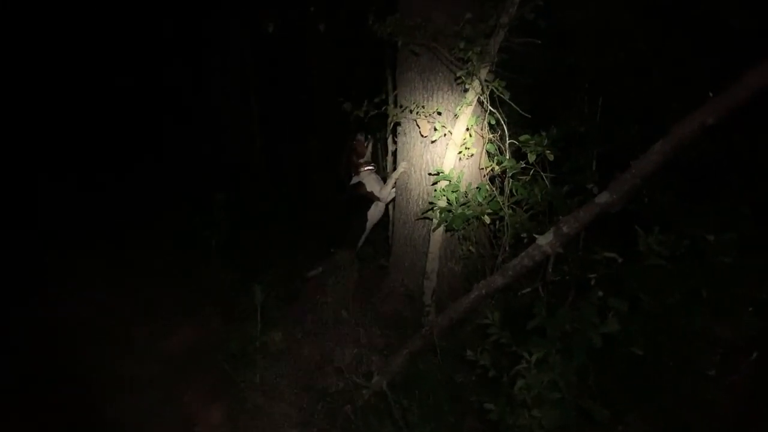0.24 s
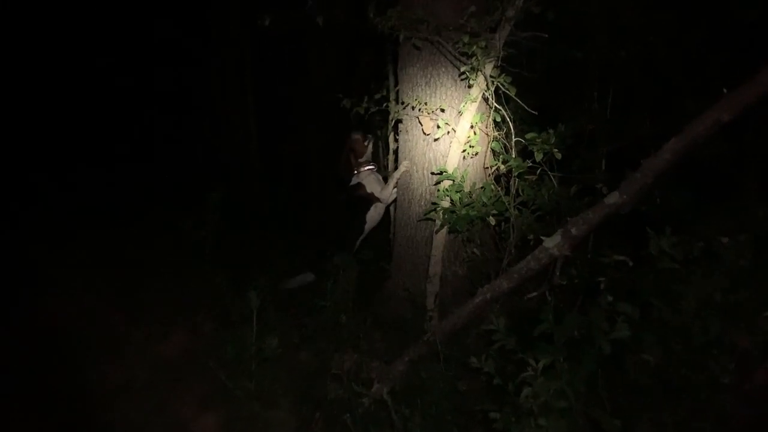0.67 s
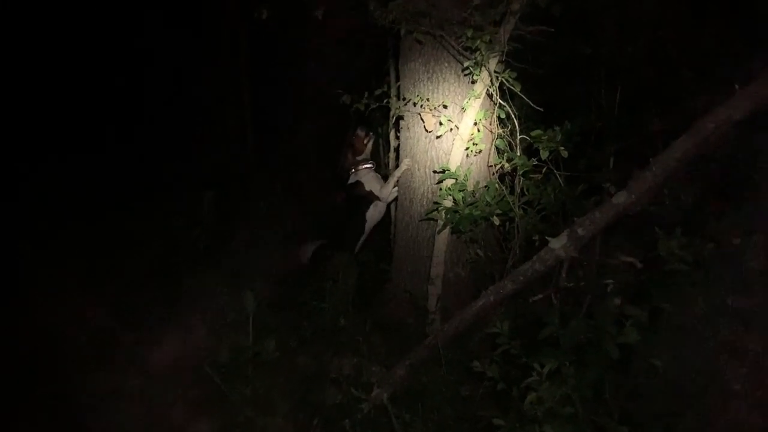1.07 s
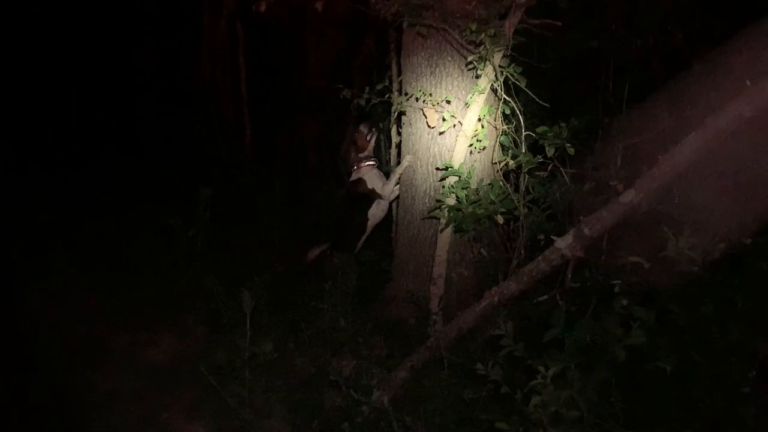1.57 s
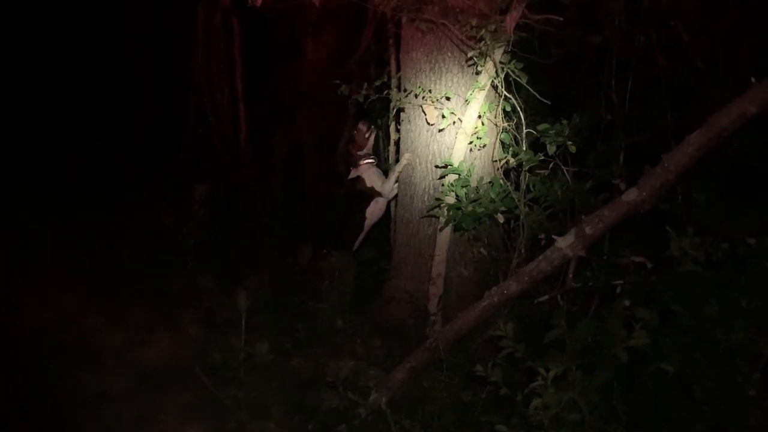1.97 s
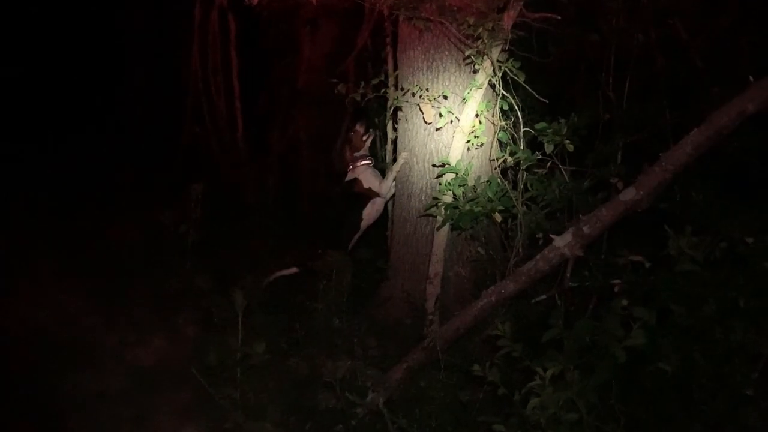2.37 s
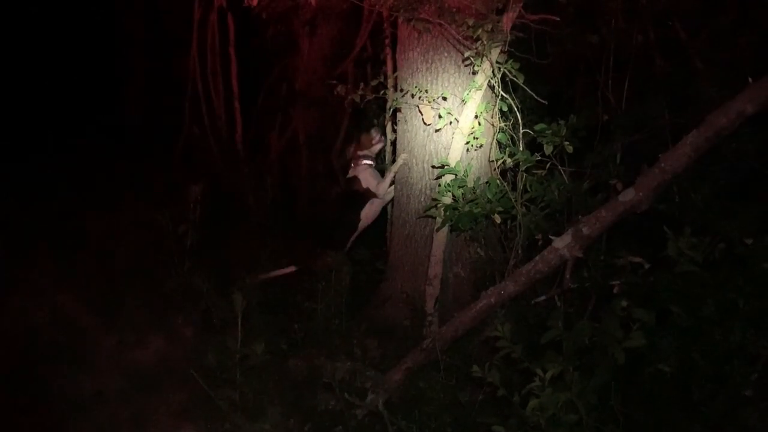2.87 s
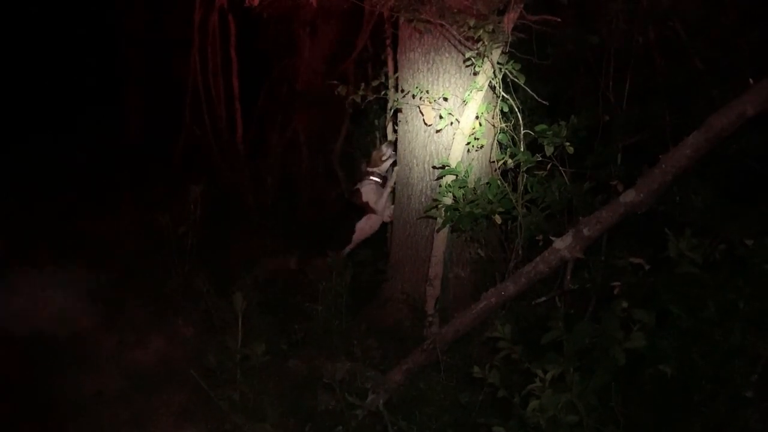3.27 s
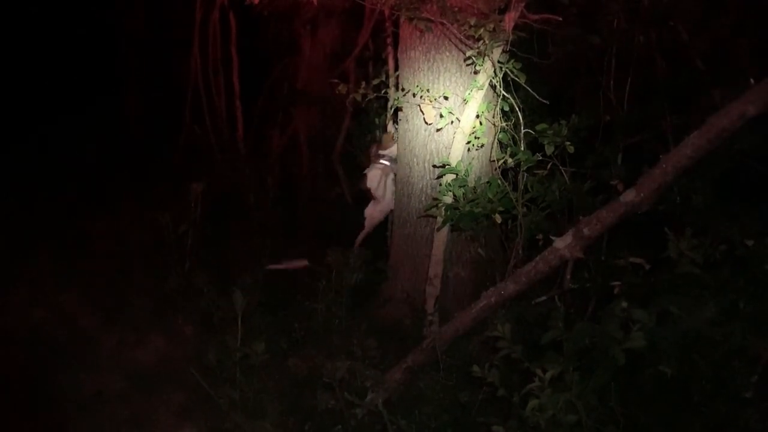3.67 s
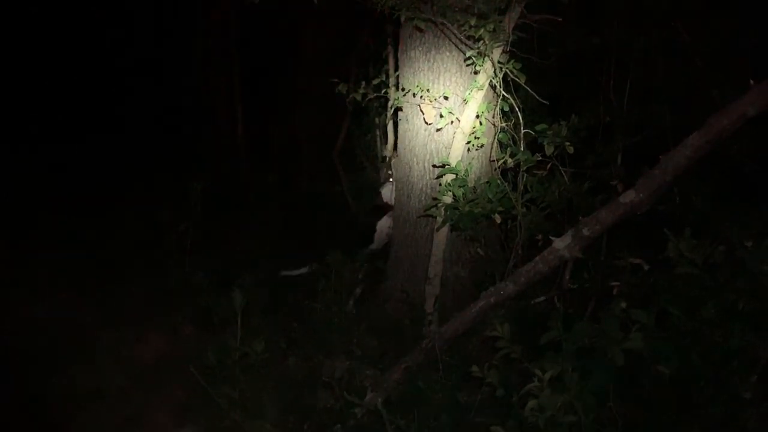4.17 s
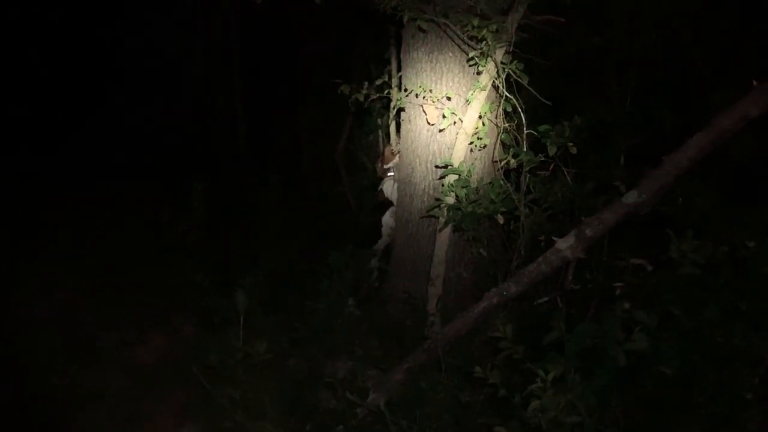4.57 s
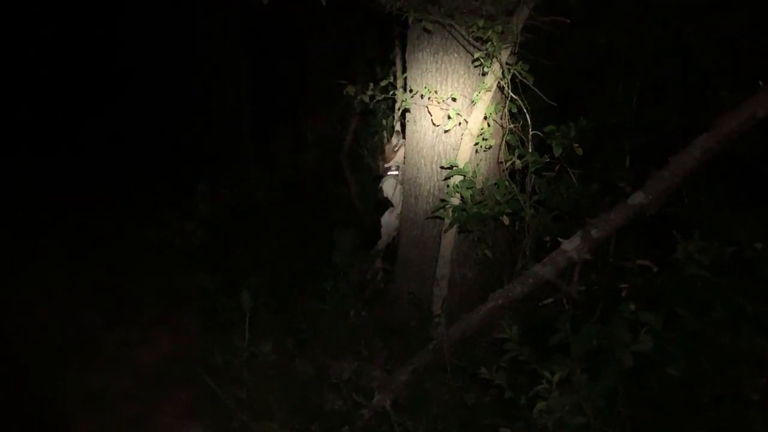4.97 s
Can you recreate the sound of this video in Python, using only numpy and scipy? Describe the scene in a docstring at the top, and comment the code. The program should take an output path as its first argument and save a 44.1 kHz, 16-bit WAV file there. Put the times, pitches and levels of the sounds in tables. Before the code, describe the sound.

At night in the woods, a hound at a tree trunk barks eight times, loud and close. Each bark starts as a thin yelp, bursts into a clear note and goes hoarse. Trees return a diffuse fading echo. Between barks come tiny puffs, a faint steady engine idle, soft hiss and distant insect trills. Stereo microphones stay fixed.

```python
"""Hound barking in the night woods

A hound barks eight times. Each bark opens with a thin high yelp made of a few harmonics, breaks into
a loud clear note, and turns hoarse as a second part of the vocal folds swings at a pitch of its own.
A ninth yelp is just starting at the end. The trees throw the barks back as a scattered, fading echo.
An engine idles faintly as a sum of steady tones; shaped noise makes the soft hiss, puffs and insects."""
import sys
import numpy as np
from scipy import signal
from scipy.fft import rfft, irfft, next_fast_len
from scipy.io import wavfile
from scipy.ndimage import uniform_filter1d, minimum_filter1d

SR = 44100
rng = np.random.default_rng(int(sys.argv[2]) if len(sys.argv) > 2 else 0)


def wav_out(sig):
    """Save sig, one row per channel (or a flat mono array), as 16-bit PCM at SR to the path in sys.argv[1]."""
    wavfile.write(sys.argv[1], SR, np.round(np.clip(np.atleast_2d(sig).T, -1, 1) * 32767).astype(np.int16))


N = 230372

# The thin opening of each bark. Each row: start in seconds, length in seconds, pitch in Hz,
# slide in Hz per second, level in dB, second harmonic over the first in dB, roughness from 0 to 1.
YELP_ROWS = [ (-.006, .052, 652, 201, -21.5, 8, .08), (0.746, 0.032, 680.6, -200, -15.5, -3, .15),
             (1.225, .056, 663, -200, -19.5, 2, 0.096), (1.732, .048, 646, -400, -21.5, 5.5, .08),
             (2.514, 0.032, 732.7, 1502.5, -12.5, -11.5, .15), (2.994, 0.032, 676.5, 2602, -22, 6.5, .15),
             (3.729, .036, 673, -1800, -22, 3.5, .12), (4.729, 0.041, 694, -1800, -33, 9.5, .6),
             (5.2, 0.064, 681, -500, -45.5, 5.5, .6)]
# The body of each bark: two pushes of breath, a clear note and a hoarse one, with a catch between.
# Each row: start in seconds, length in seconds, then seconds until the clear note ends, until the
# catch and until the jaw shuts, clear pitch, hoarse pitch and second oscillator in Hz,
# its last share from 0 to 1, how far it takes over at the end from 0 to 1, then in dB:
# chest, clear mouth, hoarse mouth, clear edge, hoarse edge, rushing air.
BARK_ROWS = [ (0.042, 0.16, .036, 0.055, .134, 469.5, 478.4, 581.2, 0.84, 0.4, -13.5, -5, -12.5, -20.5, -26.5, -43),
             (0.779, 0.16, 0.039, 0.07, .137, 490.3, 481.3, 566.4, 0.7, .2, -13.5, -4, -14, -16, -30.5, -41),
             (1.276, 0.16, .035, .055, .123, 462.4, 478, 599.7, 0.9, 0.9, -14, -7.5, -9.5, -22.5, -23, -41.5),
             (1.779, .170, .036, 0.061, 0.14, 461, 476, 575.3, .7, 0.8, -14.5, -6, -10.5, -17, -25.5, -41.5),
             (2.548, 0.16, 0.04, 0.066, 0.11, 489.5, 494, 577, 0.7, 0.2, -13.5, -4, -10, -17, -26.5, -40.5),
             (3.03, .185, 0.029, .068, .145, 464.3, 472, 621.4, 0.75, 0.8, -13.5, -4, -12, -16.5, -23, -39.5),
             (3.764, 0.17, .047, 0.071, .153, 492.9, 486.3, 575, 0.84, 1, -13.5, -7.5, -10.5, -14, -27.5, -44.5),
             (4.759, 0.17, 0.048, 0.067, .148, 504, 502.6, 583.8, 0.9, 0.2, -15.5, -5, -10.5, -19.5, -25.5, -41)]
# Short soft puffs between barks. Each row: middle in seconds, level in dB, length in seconds.
PUFF_ROWS = [(0.498, -54, 0.021), (2.292, -47, 0.054), (3.527, -49.5, 0.062), (4.495, -52, 0.041)]
# The throat's three pass bands, low to high. Each row: frequency in Hz, relative level in dB.
CHEST_BAND = [(250, -43), (340, -7), (430, 1), (600, -7), (700, 1), (850, -45.5)]
MOUTH_BAND = [(600, -39), (730, -6), (850, 1), (950, 3.5), (1030, 2), (1130, -16), (1300, -59)]
EDGE_BAND = [(1000, -39.5), (1200, 9), (1380, 5.5), (1600, 4), (1920, -5.5), (2120, -17.5), (2350, -34.5),
             (3000, -49.5)]
# The colours of rushing air and of a soft puff. Each row: frequency in Hz, relative level in dB.
AIR_COLOUR = [(1500, -40.5), (2300, -13.5), (3300, -14.5), (4000, 3.5), (4450, 2.5), (5200, -11.5),
              (7200, -2), (9700, -19.5), (11700, -4), (13400, -20), (14600, -8), (16000, -20.5)]
PUFF_COLOUR = [(200, -21.5), (500, -5.5), (750, -5), (1000, 2.5), (1400, -4.5), (1900, -5.5), (2600, -23.5),
               (8000, -38.5)]
# The colour of what the trees send back. Each row: frequency in Hz, level in dB.
WOODS_COLOUR = [(200, -15), (420, -9), (570, 3.5), (720, 5.5), (880, 0.5), (990, 1.5), (1150, 7), (1400, 7),
                (2200, 7.5), (6000, 12), (12000, 14)]
# How long the trees' long tail rings. Each row: frequency in Hz, time to fall by 60 dB in seconds.
WOODS_FALL = [(300, 0.42), (550, 1.28), (750, 0.78), (980, 1.185), (1400, 0.89), (3000, 0.09),
              (10000, 0.82)]
# The idling engine's tones. Each row: multiple of the engine's cycle, level in dB.
ENGINE_TONES = [(3, -62), (4, -58), (5, -57), (6, -56), (10, -52), (11, -44), (12, -42), (13, -44),
                (14, -61), (15, -45), (16, -61), (20, -60), (21, -60), (22, -62), (27, -65), (28, -64)]
# The night's steady noise. Each row: frequency in Hz, relative level in dB per Hz.
NIGHT_COLOUR = [(15, -33), (40, -19.5), (62, -3.5), (90, -7), (150, -2), (260, -12.5), (315, -4.5),
                (400, -13.5), (800, -23), (1600, -22), (2400, -17), (2900, -15), (3500, -24.5),
                (4600, -15.5), (6200, -21), (7200, -43.5), (16000, -45)]
# How alike that noise is left and right. Each row: frequency in Hz, likeness from -1 to 1.
NIGHT_LIKENESS = [(30, .97), (60, .85), (120, .7), (250, .8), (500, .8), (1200, .5), (2500, 0), (4500, -.2),
                  (8000, 0)]
# Faint far-off insect trills. Each row: middle in seconds, level in dB, length in seconds.
TRILL_ROWS = [(0.664, -58, 0.12), (2.421, -57.5, 0.1), (2.795, -86, .14), (4.08, -60.5, 0.16),
              (4.272, -63, 0.16), (4.638, -55.5, 0.12)]
# The narrow band of a trill. Each row: frequency in Hz, relative level in dB.
TRILL_COLOUR = [(2300, -70), (2720, 0), (2900, 18.5), (3060, -21.5), (3500, -53.5)]
# The hound's loudness between the microphones. Each row: frequency in Hz, left minus right in dB.
SIDE_LEVEL = [(480, .7), (560, 1.8), (700, 0), (950, 1.3), (1500, 1.2), (2200, -.5), (4400, -2), (8000, 0)]
# The hound's timing between them. Each row: frequency in Hz, radians by which the left leads.
SIDE_PHASE = [(100, 0), (470, .1), (690, -.4), (950, .2), (1300, -.18), (1480, -.55), (1900, .2),
              (4400, 1.6), (12000, 1.2)]

ENGINE_HZ = 7.546  # cycles per second
CUT_HZ = 15900  # top of the finished sound
# a yelp swells and scoops up to its pitch
YELP_RISE_S, YELP_RISE_DB, YELP_SCOOP_SHARE = 0.018, -23.5, 0.106
# then it cracks, always towards the same level, second harmonic and roughness
BREAK_S, BREAK_DB, BREAK_SECOND_DB, BREAK_ROUGH = 0.02, -26, -4, 1
# the clear note bursts out of the crack
ATTACK_S, ATTACK_DB, CRACK_SHARE = 0.007, -15, 0.89
# at the catch the voice weakens and its pitch sags
CATCH_S, CATCH_DB, CATCH_SAG_SHARE, SAG_S = 0.007, -6.5, 0.0759, 0.01962
# the clear note ends in a rough turn
TURN_S, TURN_SHARE, TURN_DB = 0.011, 0.96, 1
# the hoarse push is unsteady
UNEVEN_HZ, UNEVEN_DB, UNEVEN_MOUTH_DB = 56.5, 1.4, 3.5
# the second push peaks this long after the catch
SWELL_AFTER_S, SWELL_S, SWELL_DB = 0.033, 0.0086, 4.5
# the second oscillator gains ground through the second push
HOARSE_SHARE, HOARSE_GROWTH_S = 0.24, 0.091
# as the breath runs out both pitches glide down, and the level drops
GLIDE_S, GLIDE_SAG_SHARE, SECOND_SAG_SHARE = 0.0467, 0.29, 0.29
FALL_S, FALL_DB, FALL_POWER = 0.036, -15.5, 4.6
# the jaw narrows after the clear note, reopens and shuts
OPEN_S, SHUT_S, NARROW_DB, CLOSE_S, DROOP_DB_PER_S = 0.023, 0.017, -20, 0.036, 70
# the bright edge fades after the burst and returns with the second push
EDGE_FADE_S, EDGE_RISE_S, EDGE_DULL_DB = 0.024, 0.05, -33.5
HANDOVER_S = 0.028  # as the jaw shuts, the second oscillator takes over


def amp(db):
    """Turns decibels into gain."""
    return 10 ** (np.asarray(db) / 20)


def evened(x):
    """Scales a sound to an rms of 1."""
    return x / np.sqrt(np.mean(abs(x) ** 2) + 1e-20)


def read(points, hz):
    """Reads between a table's rows, spacing frequency by pitch rather than by Hz."""
    f, value = np.transpose(points)
    return np.interp(np.log(hz + 1), np.log(f + 1), value)


def colour(x, points):
    """Makes each frequency louder or softer, following a table in Hz and dB."""
    size = next_fast_len(x.shape[-1] + 2048)
    gain = amp(read(points, np.fft.rfftfreq(size, 1 / SR)))
    return irfft(rfft(x, size) * gain, size)[..., :x.shape[-1]]


def wander(n, rate_hz):
    """Random noise that moves up to about rate_hz; one second of it, at rms 1, is cut or repeated."""
    hz = np.fft.rfftfreq(SR, 1 / SR)
    smooth = rfft(rng.standard_normal(SR)) * np.exp(-(hz / rate_hz) ** 2)
    return np.resize(evened(irfft(smooth, SR)), n)


def flutter(n, rate_hz):
    """Random wobble of one harmonic in size and phase."""
    return (wander(n, rate_hz) + 1j * wander(n, rate_hz)) / np.sqrt(2)


def steadied(x, size=600):
    """Holds the level near 1 over a few cycles, leaving the fast beats in."""
    power = uniform_filter1d(uniform_filter1d(x ** 2, size), size)
    return x / np.sqrt(abs(power) + 1e-12)


def add(mix, s, sound):
    """Adds a sound to the mix at time s, or at 0 if s is earlier."""
    part = mix[max(round(s * SR), 0):][:len(sound)]
    part += sound[:len(part)]


def ease(x):
    """A smooth step from 0 to 1."""
    return np.sin(np.pi / 2 * np.clip(x, 0, 1)) ** 2


def hump(t, width_s):
    """A bell of height 1 around t = 0."""
    return np.exp(-(t / width_s) ** 2)


def gated(length, lead_s=0.0066, fade_s=0.0028):
    """Time from a sound's onset, beginning lead_s early, and a gate with soft ends."""
    t = np.arange(-lead_s, length + fade_s, 1 / SR)
    return t, ease(np.minimum(t - t[0], t[-1] - t) / fade_s)


def yelp_gesture(t, length, hz, slide_hz_per_s, level_db, second_db, rough, early_s=0.005):
    """Swell, hold, crack: pitch, roughness, level and second harmonic through a yelp."""
    rising = 1 - ease((t + early_s) / YELP_RISE_S)
    broken = ease((t - length) / BREAK_S + 1)
    pitch = (hz + slide_hz_per_s * (t - length / 2)) * (1 - YELP_SCOOP_SHARE * rising)
    roughness = rough + (BREAK_ROUGH - rough) * np.maximum(np.sqrt(broken), rising)
    level = level_db + YELP_RISE_DB * rising + (BREAK_DB - level_db) * broken
    return pitch, roughness, level, second_db + (BREAK_SECOND_DB - second_db) * broken


def yelp(start, length, *voice, third_db=-17, buzz_db=-34, rasp_db=-5.5, air_db=-29,
         shake=0.93, jitter=0.019, growl_db=-10, count=9):
    """The folds start in a high register with a faint buzz on top, raspy as the voice catches and breaks."""
    t, gate = gated(length, lead_s=0.008)
    hz, rough, level_db, second_db = yelp_gesture(t, length, *voice)
    n = len(hz)
    rough = np.clip(rough, 0.1, 1)
    shaky_hz = hz * (1 + jitter * (0.22 + 2 * rough) * wander(n, 110))
    phase = 2 * np.pi * np.cumsum(shaky_hz) / SR
    upper = amp(second_db)
    sizes = [1, upper, upper * amp(third_db)]
    sizes += [upper * amp(buzz_db) * 4 / k for k in range(4, count)]
    tone = 0
    for k, size in enumerate(sizes, 1):
        tone = tone + size * (np.exp(1j * k * phase) * (1 + shake * rough * flutter(n, 140))).imag
    rasp = amp(rasp_db) * evened(colour(wander(n, 5000), EDGE_BAND))
    growl = amp(growl_db) * evened(colour(wander(n, 5000), PUFF_COLOUR))
    air = amp(air_db) * evened(colour(wander(n, 30000), AIR_COLOUR))
    noise = rough * (rasp + growl) + np.sqrt(rough) * air
    # the noise follows the strength of the first two harmonics
    voiced = np.sqrt(2) * tone + np.sqrt(1 + upper ** 2) * noise
    return start + t[0], gate * amp(level_db) * voiced


def ports(x):
    """Nearby reflections give each microphone a slightly different colour and phase."""
    hz = np.fft.rfftfreq(N, 1 / SR)
    left = np.exp(1j * read(SIDE_PHASE, hz) / 2) * amp(read(SIDE_LEVEL, hz) / 2)
    return irfft(rfft(x) * np.array([left, 1 / left]), N)


def woods(x, wet_db=-21, near_db=2, near_t60=0.4, apart_hz=2800):
    """Trunks scatter the sound: a quick cloud from those nearby and a long thin tail, wider in the treble."""
    # about 2500 random taps a second
    taps = rng.standard_normal((2, SR)) * (rng.random((2, SR)) < 2500 / SR)
    hz, t, z = signal.stft(taps, SR, nperseg=256)
    far = amp(-60 * t / read(WOODS_FALL, hz)[:, None])
    near = amp(near_db - 60 * t / near_t60)
    width = np.array([np.ones(len(hz)), np.minimum(hz / apart_hz, 1)])[:, :, None]
    build_up = np.clip(t / 0.043, 0, 1)
    mid, side = signal.istft(z * width * (far + near) * build_up, SR, nperseg=256)[1]
    tails = np.array([mid + side, mid - side]) / np.linalg.norm(mid)
    echo = signal.fftconvolve(x[None], tails, axes=1)[:, :N]
    return amp(wet_db) * colour(echo, WOODS_COLOUR)


def engine(start_db=-0.5, end_db=0.5, drift=0.002, uneven=0.14):
    """Multiples of the engine's cycle beat into a low, uneven throb that slowly grows."""
    def sway(count):
        """Slow random drift in straight lines between count points."""
        return np.interp(np.arange(N), np.linspace(0, N, count), rng.standard_normal(count))
    turns = np.cumsum(ENGINE_HZ * (1 + drift * sway(count=12))) / SR
    hum = 0
    for k, db in ENGINE_TONES:
        cycles = round(k) * turns + rng.random() + uneven * sway(count=14)
        hum = hum + amp(db) * np.cos(2 * np.pi * cycles)
    return np.sqrt(2) * hum * amp(np.linspace(start_db, end_db, N))


def night(level_db=-45, patchy_db=2.0):
    """Random noise is shaped into low rumble and a wide soft hiss, drifting in patches."""
    frames, hz = N // 512 + 5, np.fft.rfftfreq(2048, 1 / SR)
    a, b, c, d, patches = rng.standard_normal((frames, len(hz), 5)).T
    patches = uniform_filter1d(patches, size=16, axis=0)
    patches = evened(uniform_filter1d(patches, size=9, axis=1))
    same = np.clip(read(NIGHT_LIKENESS, hz), -1, 1)[:, None]
    left = a + 1j * b
    right = same * left + np.sqrt(1 - same ** 2) * (c + 1j * d)
    z = np.array([left, right]) * amp(read(NIGHT_COLOUR, hz)[:, None] + patchy_db * patches)
    noise = signal.istft(z, nperseg=2048, noverlap=1536)[1][:, :N]
    return amp(level_db) * evened(noise)


def bark_gesture(t, length, turn_s, catch_s, shut_s, clear_hz, hoarse_hz, second_hz, last_share, takeover,
                 chest_db, clear_db, hoarse_db, clear_edge_db, hoarse_edge_db):
    """Two pushes of breath steer pitches, second oscillator, effort, and mouth and edge against effort."""
    since = t - catch_s
    onset = 1 - ease(t / ATTACK_S + 0.5)
    turn = hump(t - turn_s - TURN_S / 2, TURN_S)
    hoarse = ease(since / OPEN_S)
    ending = np.clip((t - length) / FALL_S + 1, 0, None)
    # both pitches dip at the catch and glide down at the end
    glide = np.clip((t - length) / GLIDE_S + 1, 0, None) ** 2
    sag = 1 - CATCH_SAG_SHARE * hump(since + TURN_S / 2, SAG_S)
    hz = (clear_hz + (hoarse_hz - clear_hz) * hoarse) * (sag - GLIDE_SAG_SHARE * glide)
    second = second_hz * (sag - SECOND_SAG_SHARE * glide)
    growing = HOARSE_SHARE + (last_share - HOARSE_SHARE) * ease(since / HOARSE_GROWTH_S)
    share = CRACK_SHARE * onset + TURN_SHARE * turn + ease(since / CATCH_S + 1) * growing
    alone = np.clip(takeover, 0, 1) * ease((t - shut_s) / HANDOVER_S + 0.5)
    push_db = (chest_db + TURN_DB * turn + CATCH_DB * hump(since, CATCH_S)
               + SWELL_DB * hump(since - SWELL_AFTER_S, SWELL_S))
    # the mouth opens once for each push
    first_open = ease((turn_s - t) / CLOSE_S + 0.5)
    second_open = hoarse * ease((shut_s - t) / SHUT_S + 0.5)
    mouth_db = (NARROW_DB + (clear_db - DROOP_DB_PER_S * t - NARROW_DB) * first_open
                + (hoarse_db - NARROW_DB) * second_open
                + UNEVEN_MOUTH_DB * hoarse * wander(len(t), UNEVEN_HZ))
    edge_return = ease(since / EDGE_RISE_S) * (1 - ease(ending))
    edge_db = (EDGE_DULL_DB + (clear_edge_db - EDGE_DULL_DB) * hump(t, EDGE_FADE_S)
               + (hoarse_edge_db - EDGE_DULL_DB) * edge_return)
    effort_db = (push_db + ATTACK_DB * onset + FALL_DB * ending ** FALL_POWER
                 + UNEVEN_DB * hoarse * wander(len(t), UNEVEN_HZ))
    return hz, second, share, alone, effort_db, mouth_db - push_db, edge_db - push_db - ATTACK_DB * onset


def bark(row, jitter=0.0079, second_jitter=0.023, below=1.0, above=0.34, chaos=0.98, chest_chaos=0.22,
         octave_db=3, burst_db=6, burst_s=0.094, ring_db=-35, ring_s=0.032, count=6):
    """Two oscillators beat, putting sidebands on the harmonics; chaos grows with the second's share."""
    start, length, *voice, rush_db = row
    t, gate = gated(length)
    hz, second_hz, share, alone, effort_db, mouth_db, edge_db = bark_gesture(t, length, *voice)
    n = len(hz)
    share = np.clip(share, 0.04, 0.98)
    shaky_hz = hz * (1 + jitter * (0.24 + 2 * share) * wander(n, 100))
    phase = 2 * np.pi * np.cumsum(shaky_hz) / SR
    second = 2 * np.pi * np.cumsum(second_hz * (1 + second_jitter * wander(n, 160))) / SR
    beat = np.exp(1j * (second - phase))
    clear = np.sqrt(1 - share ** 2)
    low = (np.exp(1j * phase) * (clear + share * (beat + chest_chaos * flutter(n, 280)))).imag
    high = 0
    for k in range(2, count):
        # opposite sidebands: the beat bends the pitch more than it pumps the level
        sidebands = above * beat - below / beat + chaos * flutter(n, 410)
        high = high + (np.exp(1j * k * phase) * (clear + share * (k / 2) * sidebands)).imag
    # as it takes over, the second oscillator sounds with its own octave
    low = (1 - alone) * low + alone * np.sin(second)
    high = (1 - alone / 2) * high + alone * amp(octave_db) * np.sin(2 * second)
    chest = steadied(colour(low, CHEST_BAND))
    mouth = amp(mouth_db) * steadied(colour(high, MOUTH_BAND))
    edge = amp(edge_db) * steadied(colour(high, EDGE_BAND))
    # the ninth harmonic rings high at the opening and dies away
    ninth = (np.exp(9j * phase) * (1 + flutter(n, 60))).real
    ring = amp(ring_db + mouth_db) * np.exp(-t / ring_s) * ninth
    # air rushes through once a cycle, with a boost that fades from the first burst
    rush = (1 + 0.5 * np.cos(phase)) * evened(colour(wander(n, 25000), AIR_COLOUR))
    air = amp(rush_db + 0.65 * mouth_db + burst_db * np.exp(-t / burst_s)) * rush
    return start + t[0], gate * amp(effort_db) * (chest + mouth + edge + ring + air)


def swell(middle, level_db, length, spectrum):
    """Coloured noise swells and fades as a puff or trill; the level is the rms of the whole swell."""
    n = int(length * SR)
    shaped = colour(wander(n, 8000), spectrum) * np.hanning(n)
    return middle - length / 2, amp(level_db) * evened(shaped)


def insects():
    """Narrow bands of noise swell and fade as faint trills in the distance."""
    out = np.zeros(N)
    for row in TRILL_ROWS:
        add(out, *swell(*row, TRILL_COLOUR))
    return out


def scene():
    """The hound, its echo, the engine, the night and the insects."""
    dog = np.zeros(N)
    for row in YELP_ROWS:
        add(dog, *yelp(*row))
    for row in BARK_ROWS:
        add(dog, *bark(row))
    for row in PUFF_ROWS:
        add(dog, *swell(*row, PUFF_COLOUR))
    return ports(dog) + woods(dog) + engine() + night() + insects()


def record(dry, ceiling=1.0):
    """A fast limiter turns down the peaks; then a filter takes off the very top."""
    safe_gain = np.minimum(ceiling / (abs(dry).max(0) + 1e-9), 1)
    limited = dry * uniform_filter1d(minimum_filter1d(safe_gain, size=300), size=300)
    low_pass = signal.firwin(511, CUT_HZ, window=("kaiser", 9), fs=SR)
    return signal.oaconvolve(limited, low_pass[None], "same")


dry = scene()
out = record(dry)
wav_out(out)
```